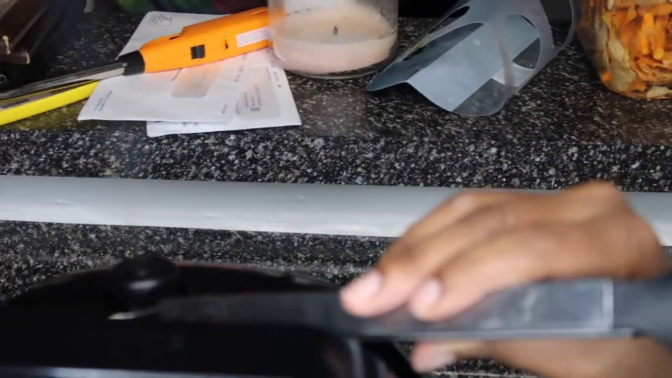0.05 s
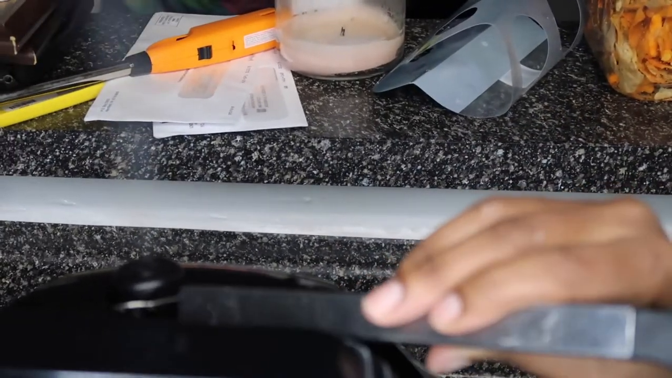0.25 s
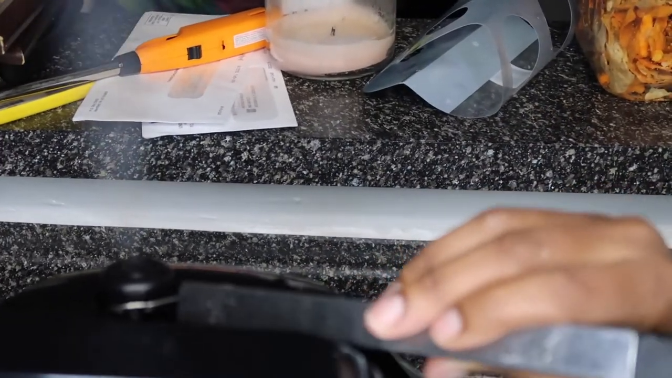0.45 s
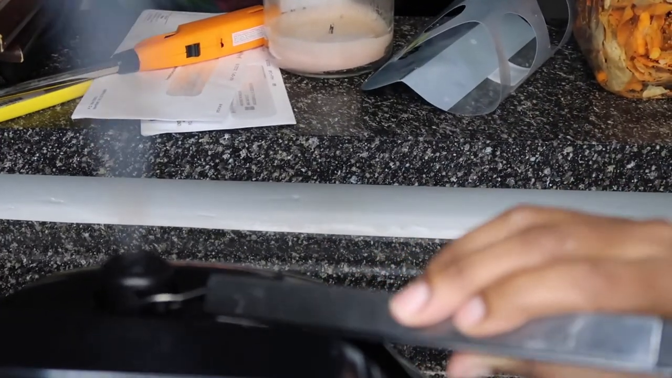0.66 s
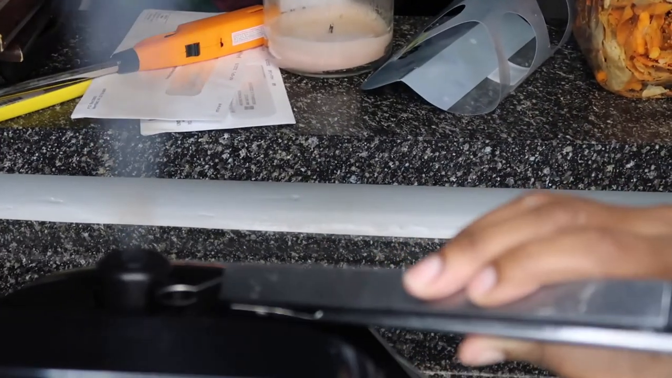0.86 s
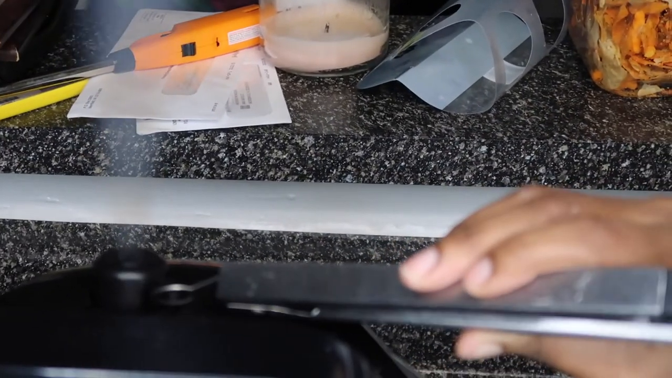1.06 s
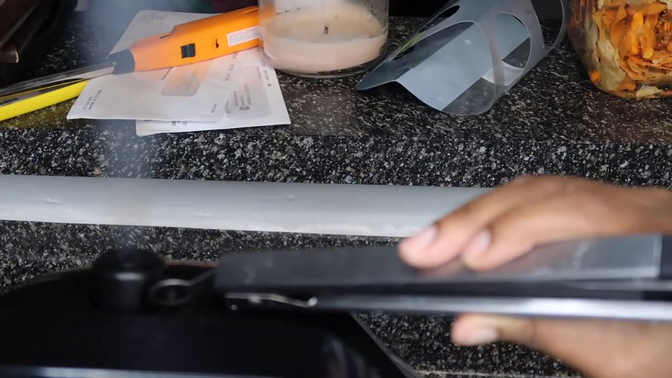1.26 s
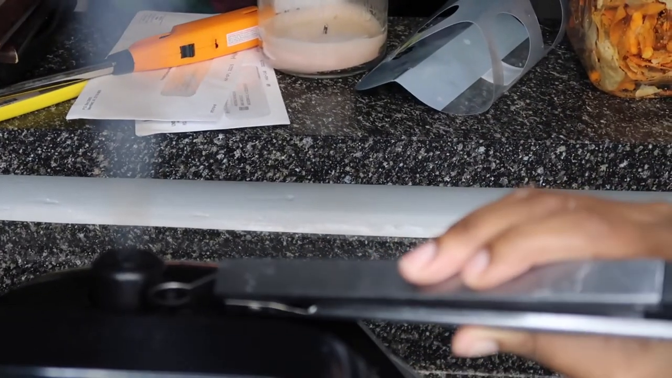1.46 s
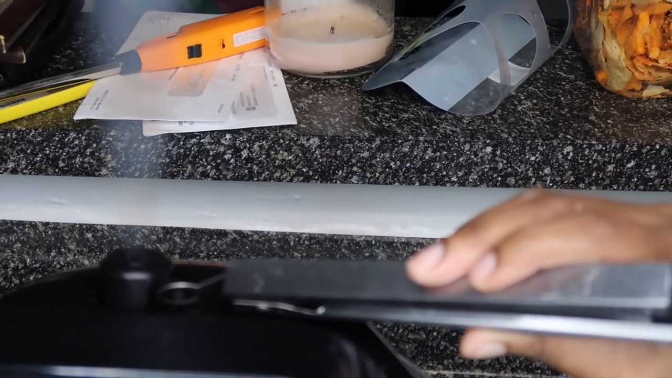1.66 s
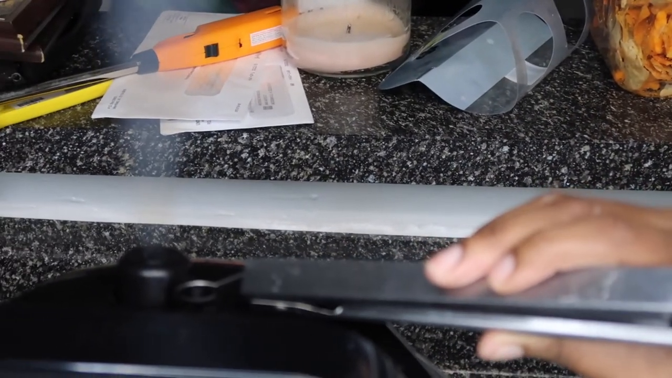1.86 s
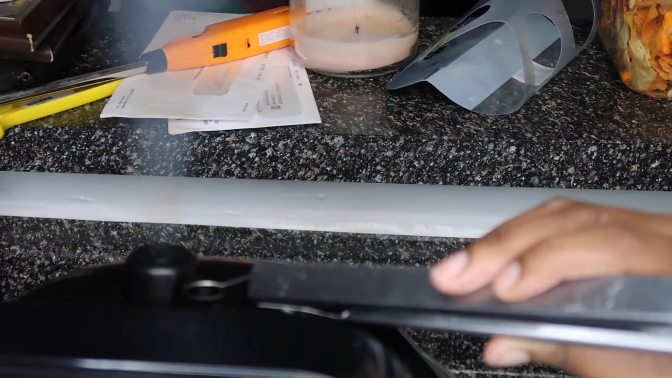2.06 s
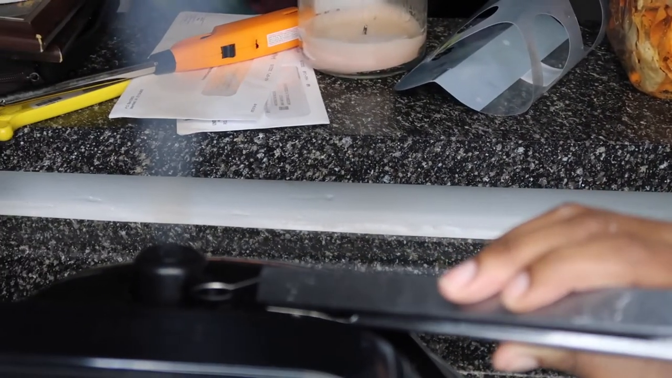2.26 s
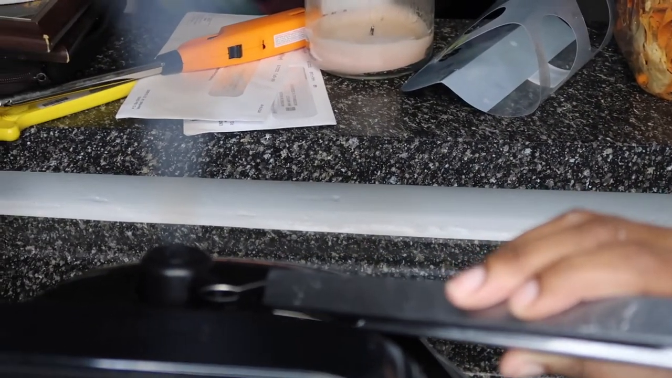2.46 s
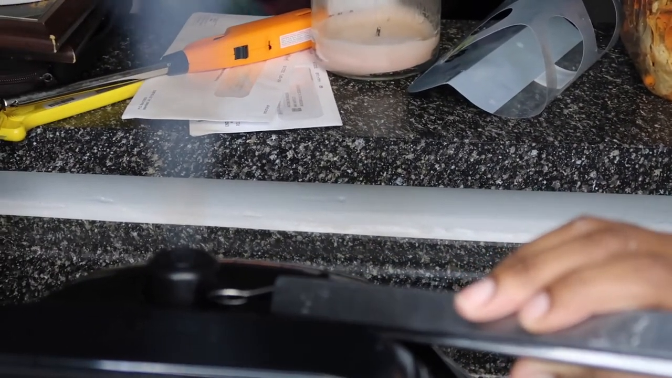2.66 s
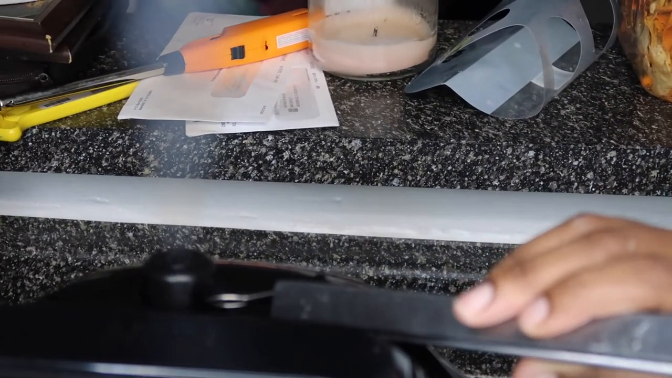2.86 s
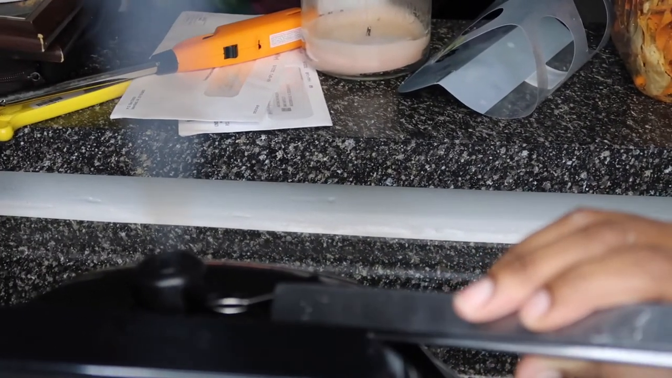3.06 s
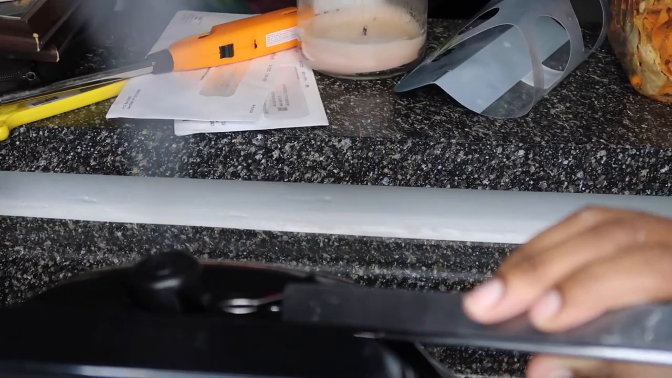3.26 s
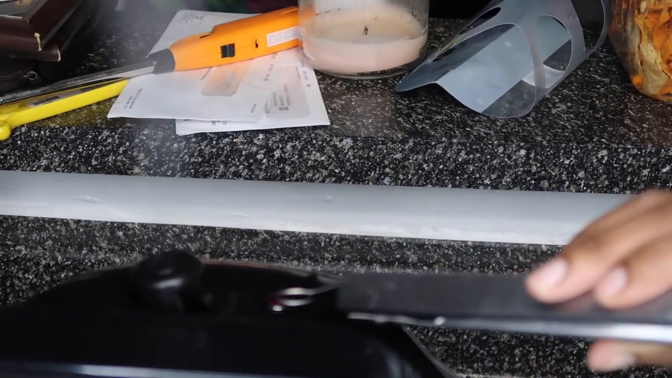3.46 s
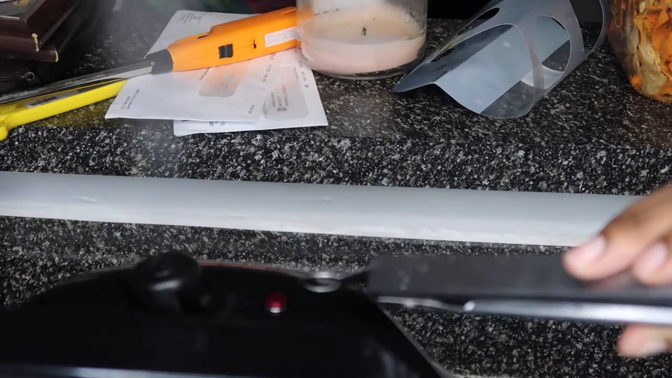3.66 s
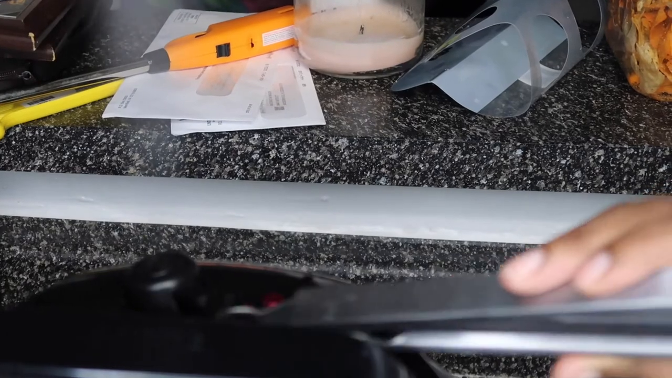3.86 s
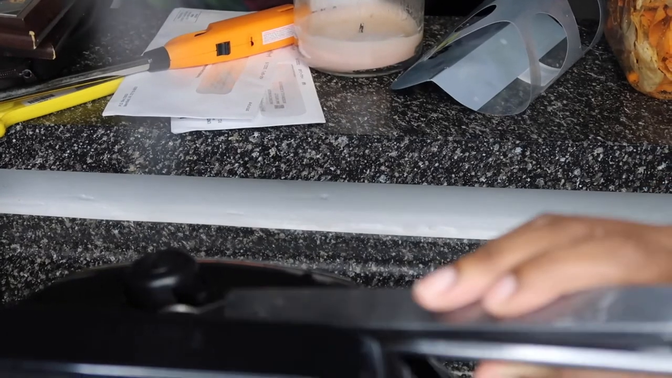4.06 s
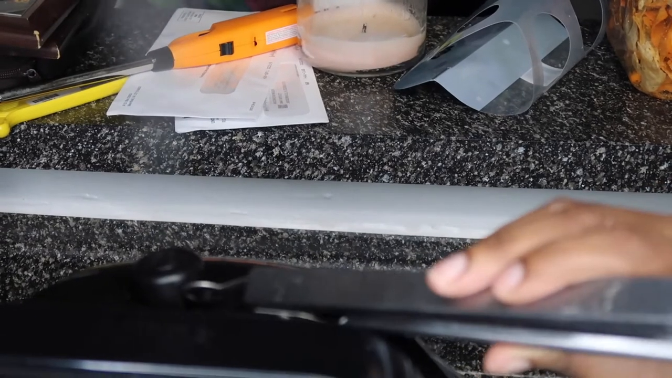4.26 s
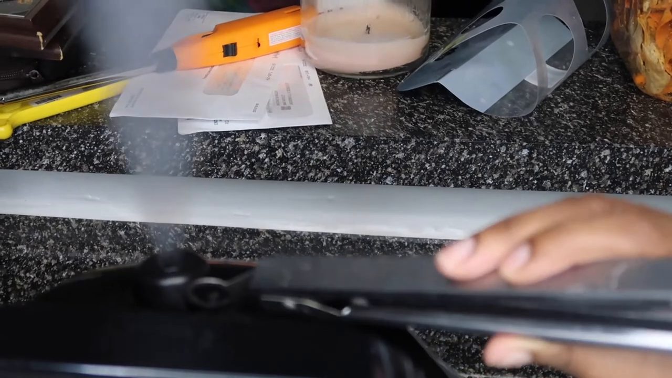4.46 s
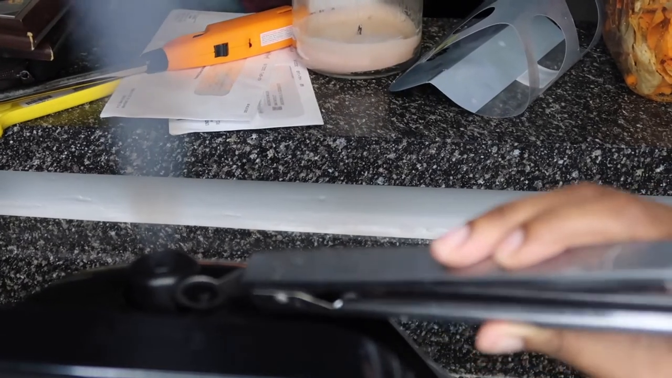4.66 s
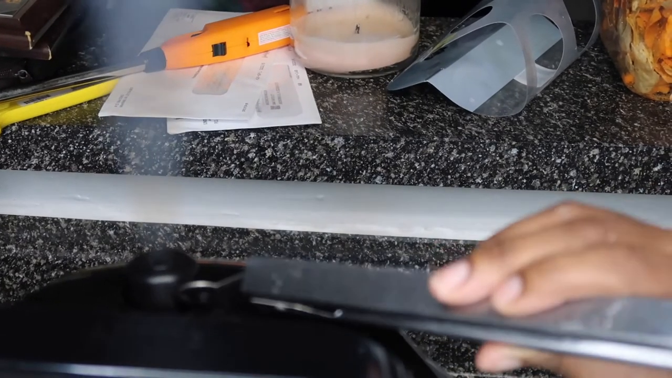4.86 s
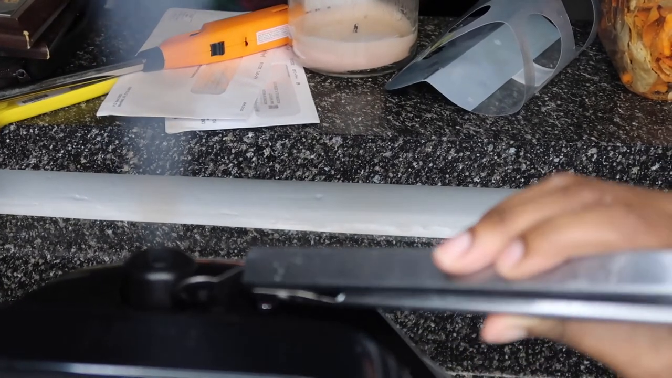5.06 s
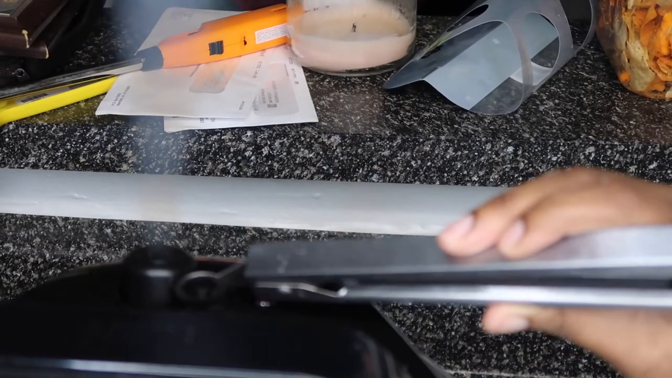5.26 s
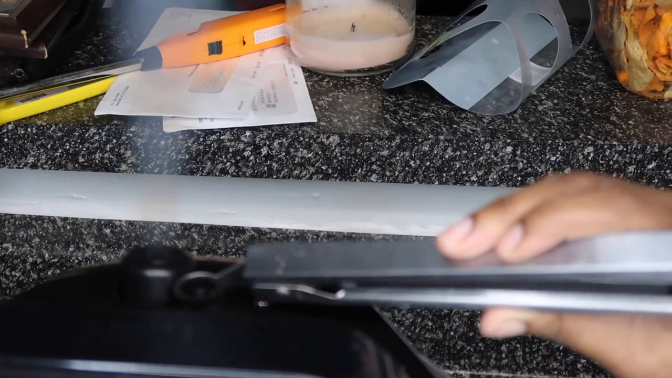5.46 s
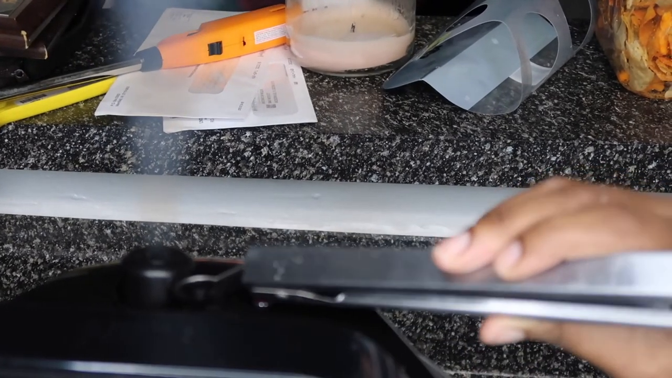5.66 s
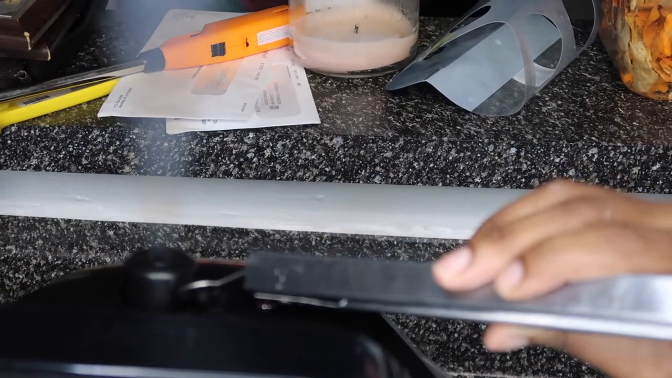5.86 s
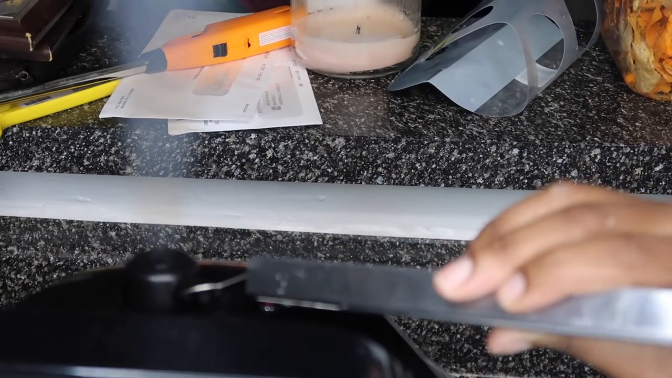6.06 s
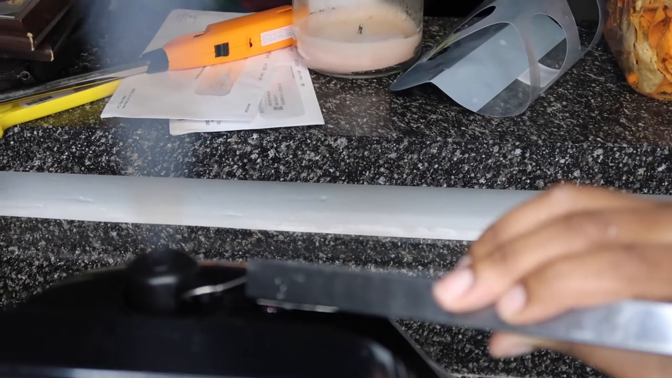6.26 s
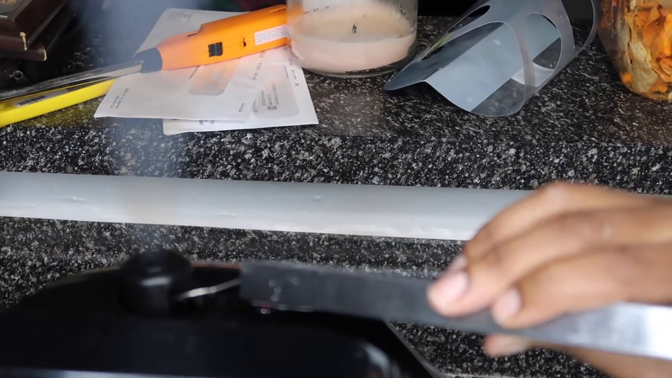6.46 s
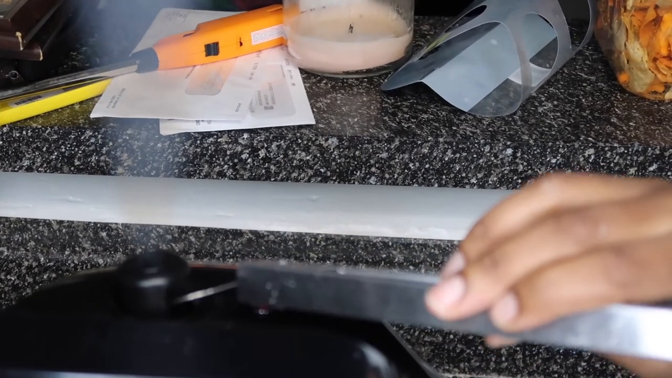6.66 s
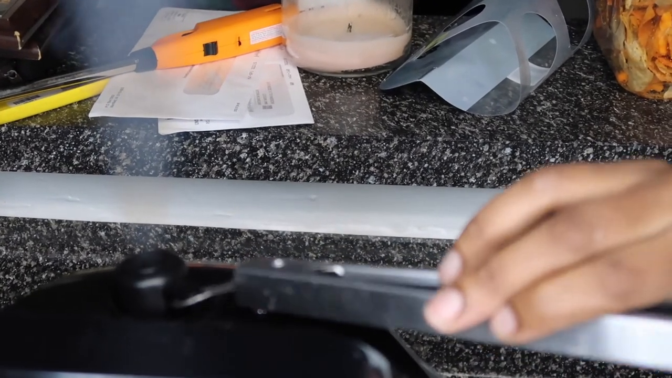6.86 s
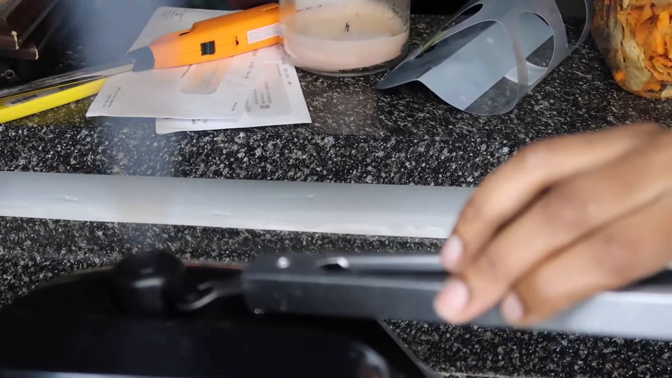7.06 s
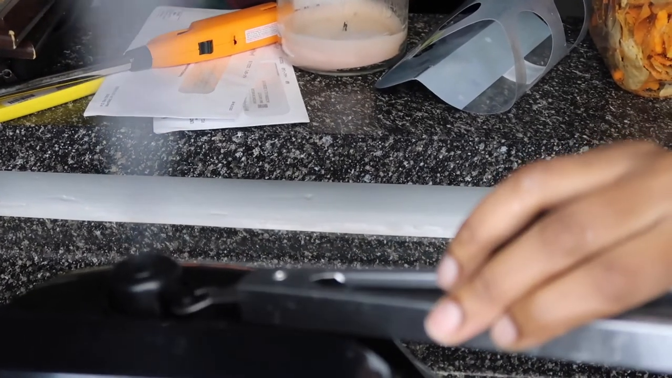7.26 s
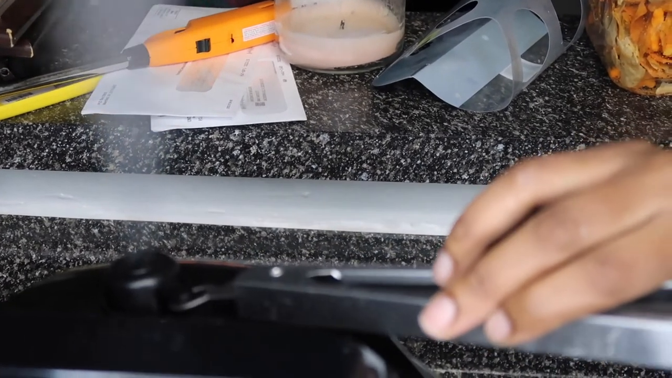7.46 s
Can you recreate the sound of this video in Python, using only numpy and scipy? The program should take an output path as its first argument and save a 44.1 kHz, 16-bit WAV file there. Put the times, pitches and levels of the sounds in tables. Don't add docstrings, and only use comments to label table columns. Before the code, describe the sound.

Metal tongs scrape and knock a pressure cooker valve open, and steam bursts out in a loud, close, steady hiss with a breathy roar.

```python
import sys
import numpy as np
from scipy import signal
from scipy.fft import rfft, irfft, next_fast_len
from scipy.io import wavfile
from scipy.ndimage import uniform_filter1d, map_coordinates

SR = 44100
rng = np.random.default_rng(int(sys.argv[2]) if len(sys.argv) > 2 else 0)


def wav_out(sig):
    wavfile.write(sys.argv[1], SR, np.round(np.clip(np.atleast_2d(sig).T, -1, 1) * 32767).astype(np.int16))


def boost_factor(decibels):
    exponent = np.asarray(decibels, float) / 20
    return 10 ** exponent


N = 331632
USUAL_DB = -26.5


def unit(x):
    return x / np.sqrt(np.mean(x ** 2) + 1e-20)


def along(points, hz):
    f, v = np.transpose(points)
    return np.interp(np.log(hz + 1), np.log(f + 1), v)


def curves(rows):
    s, *cols = np.transpose(rows)
    return [np.interp(np.arange(N) / SR, s, c) for c in cols]


def wobble(rate):
    coarse = np.arange(0, N + 64, 64)
    knots = rng.standard_normal(int(N * rate / SR) + 4)
    return np.interp(np.arange(N), coarse, map_coordinates(knots, [coarse * rate / SR]))


def filtered(x, response):
    m = next_fast_len(N + SR // 2)
    return irfft(rfft(x, m) * response(np.fft.rfftfreq(m, 1 / SR)), m)[..., :N]


def coloured(x, spectrum):
    return filtered(x, lambda hz: boost_factor(along(spectrum, hz)))


def modes(table):
    def response(f):
        total = 0
        for k, (c, w, db) in enumerate(table):
            total = total + (-1) ** k * boost_factor(db) * 1j * f * w / (c * c - f * f + 1j * f * w)
        return total
    return response


def band_unit(x, low_hz, high_hz):
    return x / np.std(filtered(x, lambda hz: (hz > low_hz) & (hz < high_hz)))


def soft_band(x, low_hz, high_hz):
    return filtered(x, lambda hz: np.exp(-((2 * hz - low_hz - high_hz) / (high_hz - low_hz)) ** 4))


def lifted(x, low_hz, high_hz, db):
    return x + (boost_factor(db) - 1) * soft_band(x, low_hz, high_hz)


def band(x, low_hz, high_hz):
    part = soft_band(x, low_hz, high_hz)
    return unit(part), x - part


def patches(shape, bins, frames):
    field = uniform_filter1d(rng.standard_normal(shape), size=bins, axis=0)
    return unit(uniform_filter1d(field, size=frames, axis=1))


def turbulence(patchy_db):
    z = signal.stft(rng.standard_normal(N), nperseg=512)[2]
    gain = boost_factor(patchy_db * patches(z.shape, 6, 12))
    return unit(signal.istft(z * gain, nperseg=512)[1][:N])


def echoes(x, echo_db, t60, count):
    t = np.arange(SR // 8) / SR
    place = np.linspace(0, count - 1, N)
    out = x.copy()
    for k in range(count):
        tail = rng.standard_normal(len(t)) * boost_factor(-60 * t / t60)
        share = np.cos(np.pi / 2 * np.clip(place - k, -1, 1))
        out += boost_factor(echo_db) * share * signal.fftconvolve(x, tail / np.linalg.norm(tail))[:N]
    return out


def room_difference():
    return boost_factor(-74) * unit(coloured(turbulence(patchy_db=0), [(30, -12), (300, -4), (900, -2), (1500, -60)]))


# frequency in Hz, level in dB per Hz.
KITCHEN = [(15, -62), (25, -34), (165, -16), (219, -13.5), (244, -14.5), (330, -7), (566, -4), (881, -9),
           (1000, 2), (1100, -13), (1430, -61), (2420, -120)]
# frequency in Hz, level in dB.
HUM = [(253.0, -69.5)]


def kitchen():
    t = np.arange(N) / SR
    hum = sum(boost_factor(db + 2.0 + wobble(3.26)) * np.sin(2 * np.pi * hz * t) for hz, db in HUM)
    murmur_db = -49 - 60 * abs(t - .1) / 1.6 + 1.2 * wobble(19)
    murmur = unit(coloured(rng.standard_normal(N), [(30, -30), (100, -21), (200, -0.5), (400, -2.0), (900, -50)]))
    swell_db = 4 * np.exp(-((t - 0.83) / 0.59) ** 2)
    rumble_db = -55 + swell_db + 0.27 * (curves(FLOW)[0] - USUAL_DB) + 1.4 * wobble(3.54)
    rumble = band_unit(coloured(rng.standard_normal(N), KITCHEN), 120, 920)
    return hum + boost_factor(murmur_db) * murmur + boost_factor(rumble_db) * rumble


# start in seconds, peak level in dB, lid pitch in Hz.
KNOCKS = [(0.062, -26.5, 564), (0.083, -27, 450), (0.1, -28, 430), (0.299, -43, 563), (0.689, -35.5, 373),
          (0.881, -31.5, 587), (0.953, -43, 646), (0.991, -41, 436), (4.194, -33, 530), (4.438, -42, 496),
          (4.469, -38, 525), (4.496, -39, 640), (4.522, -41, 509), (5.837, -37, 590)]


def knocks():
    out, t = np.zeros(N + SR), np.arange(SR // 5) / SR
    for s, db, hz in KNOCKS:
        ring = np.sin(2 * np.pi * hz * t) * boost_factor(-60 * t / 0.047)
        ring += .5 * np.sin(2 * np.pi * 1.5 * hz * t) * boost_factor(-60 * t / 0.036)
        ring += 0.32 * np.sin(2 * np.pi * 1190 * t) * boost_factor(-60 * t / 0.064)
        crack = signal.lfilter([.1, 0, -.1], [1, -1.86, .87], rng.standard_normal(len(t)))
        ring += .5 * crack * boost_factor(3 - 60 * t / .045)
        out[round(s * SR):][:len(t)] += boost_factor(db + 1.2) * ring * (1 - np.exp(-t / .002))
    return out[:N]


# time in seconds, level in dB.
SCRAPE = [
    (0, -36),
    (.03, -38),
    (.06, -32),
    (.085, -35),
    (.12, -50),
    (.16, -65),
    (.3, -90),
]
# frequency in Hz, width in Hz, level in dB.
LID = [(450, 26, 6), (706, 43, -4), (1164, 31, 5.5), (1520, 32, 0), (2520, 84, -2), (3120, 670, -17.5)]
# start in seconds, level in dB, 60 dB decay time in seconds.
RASPS = [
    (.881, -44, .08),
    (4.437, -43, .35),
]


def scrapes():
    now = np.arange(N) / SR
    grit = rng.standard_normal(N) * boost_factor(1.5 * wobble(90))
    rasp = sum(boost_factor(db - 60 * abs(now - s) / t60) * (now > s) for s, db, t60 in RASPS)
    dull = unit(coloured(grit, [(200, -40), (380, -9), (550, 0), (1000, -1), (1400, -8), (2500, -50)]))
    return rasp * dull + boost_factor(curves(SCRAPE)[0]) * unit(filtered(grit, modes(LID)))


# time in seconds, hiss level in dB.
FLOW = [(.09, -30.5), (.19, -29), (.27, -24), (.41, -29.5), (.55, -23.5), (.74, -26.5), (.85, -24.5),
        (1.7, -27), (2.1, -25), (2.75, -27.5), (3.4, -26), (4.1, -27.5), (4.42, -29), (5.0, -26.5),
        (5.6, -26), (6.0, -27), (6.9, -27), (7.52, -27.5)]
# time in seconds, gain in dB, rise in seconds.
VALVE = [
    (.059, 23, .008),
    (.086, 21, .007),
]
# break-off time in seconds, level in dB, swell in seconds.
SPURTS = [(.135, -1.5, 0.02), (.33, 4.5, 0.091), (.47, 0, 0.023), (.66, 3, 0.11), (.93, -2.5, 0.23),
          (1.73, 0.5, 0.26), (2.35, 1, 0.19), (2.44, -1.5, 0.13), (2.74, -0.5, 0.037), (2.82, -2.5, 0.031),
          (3.82, 2, 0.11), (4.1, 1, 0.11), (4.43, -3, .1), (4.49, 5.5, 0.023), (4.58, -1, 0.022),
          (4.76, 2.5, 0.073), (5.1, 0.5, 0.34), (6.62, 1, 0.054), (7.17, -1.5, 0.15), (7.3, 0.5, 0.048),
          (7.5, 0.5, 0.037)]


def flow():
    t = np.arange(N) / SR
    break_s = 0.0049
    valve = sum(db * (np.clip((t - s) / rise + .5, 0, 1) - 1) for s, db, rise in VALVE)
    spurts = sum(db * np.exp(-((t - s) / np.where(t < s, swell, break_s)) ** 2) for s, db, swell in SPURTS)
    return curves(FLOW)[0], valve, spurts


# frequency in Hz, level in dB per Hz.
ROAR = [(410, -69.5), (700, -39), (966, -32.5), (1110, -29), (1380, -15.5), (1470, -16.5), (1580, -10.5),
        (1700, -9.5), (2010, 2), (2250, -9), (2540, -8.5), (2740, -14), (4200, -25.5), (5460, -25),
        (9240, -120)]
CAVITY_HZ = [1920, 2000, 2090, 2200]


def cavity_roar(cover):
    pitch_hz = 1929 + 216 * cover + 25 * wobble(6)
    jet = turbulence(patchy_db=1)
    place = np.interp(pitch_hz, CAVITY_HZ, np.arange(len(CAVITY_HZ)))
    spectrum = [(60, -110)] + list(ROAR)
    roar = 0
    for k, centre in enumerate(CAVITY_HZ):
        warp = lambda hz: hz - (centre - 2000) * np.exp(-((hz - 1900) / 380) ** 2)
        shape = filtered(jet, lambda hz: boost_factor(along(spectrum, warp(hz))))
        roar = roar + np.clip(1 - abs(place - k), 0, 1) * band_unit(shape, 1300, 3200)
    roar = band_unit(echoes(roar, echo_db=-8.5, t60=0.1, count=3), 1300, 2265)
    return lifted(roar, 2220, 2980, 3.5 * cover ** 2)


def shading(x, depth_db):
    hz, t, z = signal.stft(x, SR, nperseg=512)
    field = patches(z.shape, 4, 24)
    reach = np.clip((hz[:, None] - 7500) / 3000, 0, 1) * np.interp(t, np.arange(N) / SR, depth_db)
    return signal.istft(z * boost_factor(reach * field), SR, nperseg=512)[1][:N]


# frequency in Hz, level in dB per Hz.
HISS = [(1940, -27), (3300, 1), (4130, -3.5), (5160, -7), (5590, -1), (6210, -1.5), (7320, -2),
        (8620, -7.5), (9330, -5.5), (10700, -7.5), (11600, -5.5), (12700, -6), (15200, -11), (15900, -17)]
# frequency in Hz, width in Hz, level in dB.
CAP = [(4930, 60, 1), (5175, 35, -4), (5450, 50, 6), (5680, 50, -3), (5770, 35, -2), (6165, 30, -1),
       (6235, 30, -2), (6611, 35, 1), (6746, 25, -4), (7270, 80, -5), (7410, 30, -3), (8040, 100, -3),
       (9280, 150, -3)]
# frequency in Hz, width in Hz, level in dB.
GLINT = [(7280, 30, 0)]
# time in seconds, pitch in Hz at which the ports cancel.
TURN = [(0, 10800), (1.35, 10800), (1.5, 11300), (2.85, 11300), (3.05, 10800), (3.45, 10800), (3.75, 11300),
        (4.2, 11250), (4.42, 10800), (5.75, 10750), (5.9, 10300), (6.25, 10050), (6.6, 10100), (6.8, 10300),
        (7.25, 10000), (7.52, 10100)]


def jet_hiss(jet, cover, cap_db):
    t = np.arange(N) / SR
    cancel_hz, = curves(TURN)
    near = lambda hz: np.exp(-((cancel_hz - hz) / 380) ** 2)
    top_db = -11 - 12 * near(10800) + 2.6 * wobble(12)
    dip_db = -11 * near(10000) + 2.2 * wobble(8)
    whistling = filtered(jet, lambda hz: 1 + boost_factor(3) * abs(modes(CAP)(hz)))
    hiss = coloured(whistling, [(900, -110)] + list(HISS))
    cap, hiss = band(echoes(hiss, echo_db=-4.5, t60=0.12, count=5), 4250, 5420)
    hiss = shading(hiss, depth_db=2.8 + 1.2 * near(10000))
    hiss = lifted(hiss, 9550, 10450, dip_db)
    top, hiss = band(hiss, 10410, 11240)
    hiss = band_unit(hiss, 4600, 8200) + boost_factor(cap_db) * cap + boost_factor(top_db) * top
    hiss = lifted(hiss, 2350, 3300, 5 * cover ** 2)
    hiss = lifted(hiss, 11100, 15400, -3.5 * near(9760))
    glint_db = -27.5 + 21 * np.interp(t, (2.8, 3.35, 4.1, 4.5), [0.38, 0.87, 1, 0.31])
    return hiss + boost_factor(glint_db) * unit(filtered(jet, modes(GLINT)))


# frequency in Hz, level in dB per Hz.
SPLIT = [(2120, -50), (3600, -22), (3760, -20), (4050, -9), (5630, -7), (6110, -1.5), (7220, -10),
         (8590, 3.5), (9320, -26), (10200, 0), (12200, -2.5), (15100, -14), (15900, -20)]


def opposed_hiss(jet, cap_db):
    across = .45 * filtered(jet, lambda hz: 1j + 0 * hz) + .9 * turbulence(patchy_db=1.5)
    split = coloured(across, [(900, -120)] + list(SPLIT))
    split = unit(echoes(split, echo_db=-22, t60=0.053, count=5))
    return lifted(split, 3600, 5200, cap_db + 1.5)


# time in seconds, share of the valve covered from 0 to 1.
COVER = [(0, 0.97), (.45, 0.9), (.66, 0.9), (.78, 0.2), (1.3, 0), (2.8, 0.27), (3.1, 0.42), (3.6, 0.77),
         (4.45, 0.48), (5.05, 0.4), (5.25, 0.09), (6.1, 0.08), (6.7, 0.23), (7.1, .05), (7.52, 0.64)]


def steam():
    t = np.arange(N) / SR
    slow_db, valve_db, spurt_db = flow()
    cover, = curves(COVER)
    cap_db = -1.5 - 8.5 * cover + 0.5 * wobble(9)
    hiss_db = slow_db + valve_db + 0.15 * spurt_db
    fill_db = -5.5 * np.exp(-(t / 0.61) ** 2)
    roar_db = -20 + 0.5 * (slow_db - USUAL_DB) + np.maximum(valve_db, -25) + spurt_db + fill_db
    split_db = 4.5 + 1.5 * t * SR / N - 2 * np.exp(-(t / 0.44) ** 2)
    flutter = .3 * wobble(3) + .55 * wobble(6) + .65 * wobble(14) + .55 * wobble(30)
    jet = turbulence(patchy_db=0.5)
    hiss = boost_factor(hiss_db + flutter) * jet_hiss(jet, cover, cap_db)
    roar = boost_factor(roar_db + .5 * flutter + 0.22 * wobble(9.3)) * cavity_roar(cover)
    return roar + hiss, boost_factor(hiss_db + split_db + flutter) * opposed_hiss(jet, cap_db)


def scene():
    mid, side = steam()
    mid = mid + kitchen() + knocks() + scrapes()
    side = side + room_difference()
    return np.array([mid + side, mid - side])


def roll_off(x):
    return signal.sosfilt(signal.butter(12, 17010, fs=SR, output="sos"), x)


def record(dry):
    soft = dry / (1 + abs(dry / .85) ** 6) ** (1 / 6)
    mix = filtered(soft, lambda hz: hz < 15760)
    return roll_off(mix)


dry = scene()
out = record(dry)
wav_out(out)
```